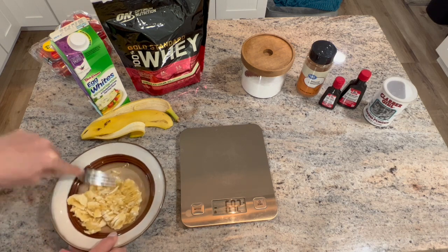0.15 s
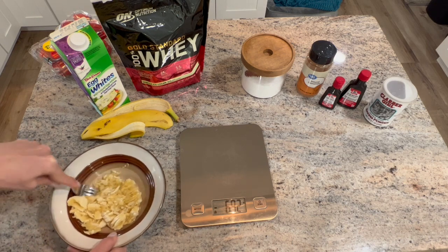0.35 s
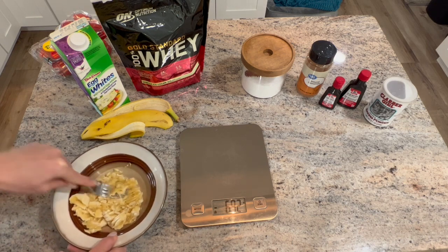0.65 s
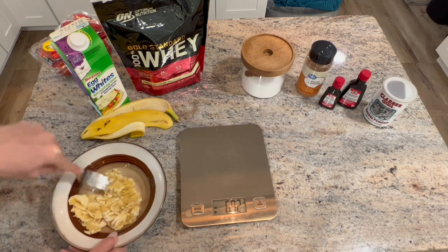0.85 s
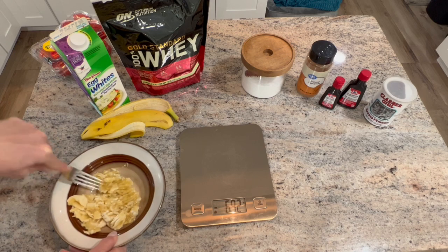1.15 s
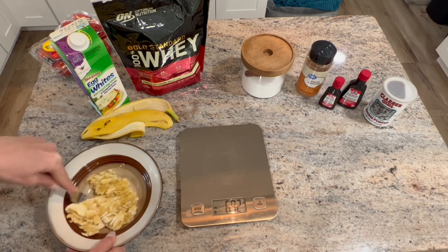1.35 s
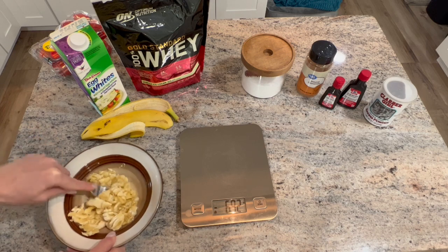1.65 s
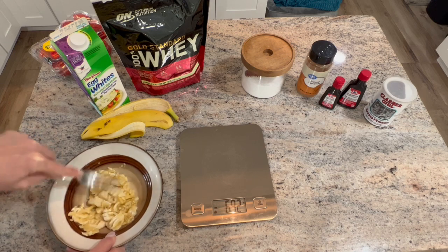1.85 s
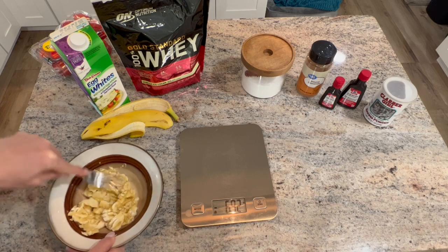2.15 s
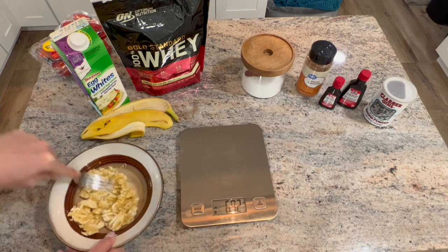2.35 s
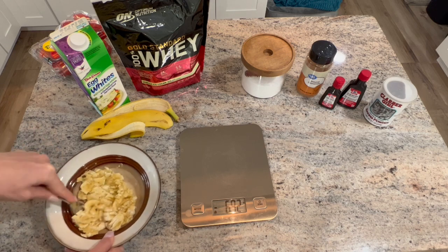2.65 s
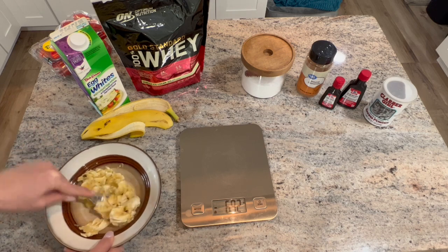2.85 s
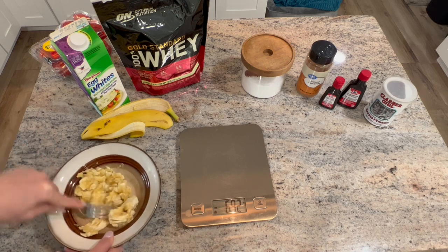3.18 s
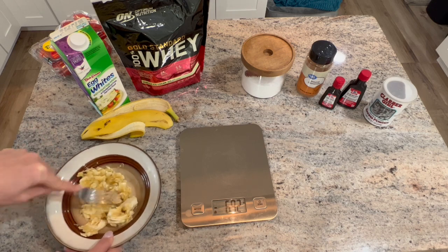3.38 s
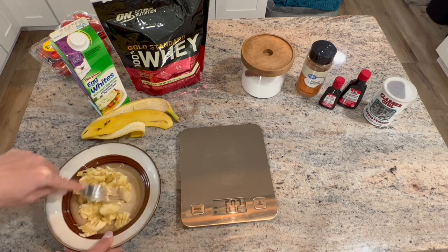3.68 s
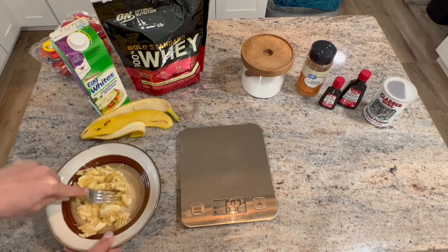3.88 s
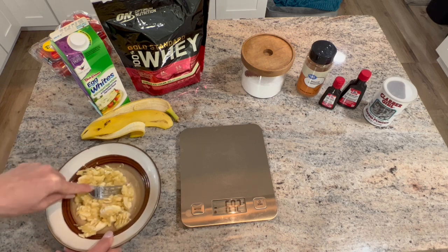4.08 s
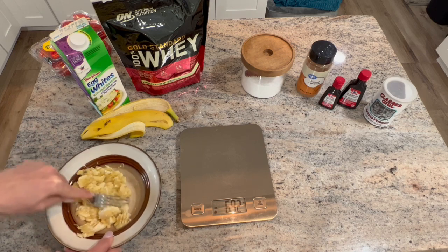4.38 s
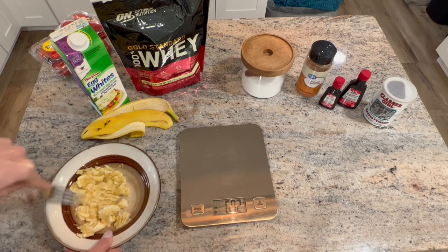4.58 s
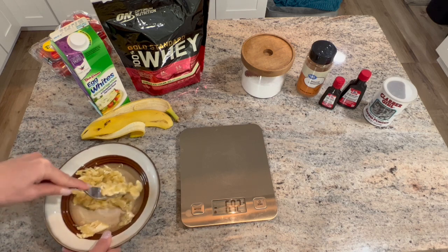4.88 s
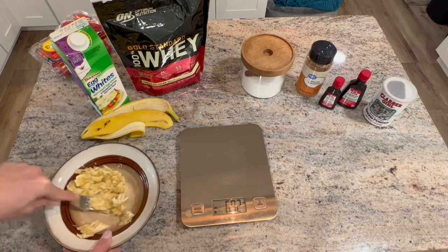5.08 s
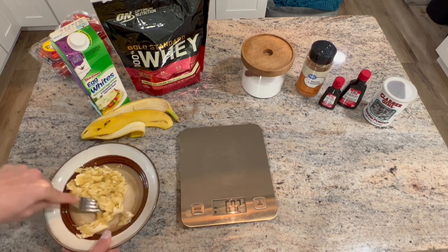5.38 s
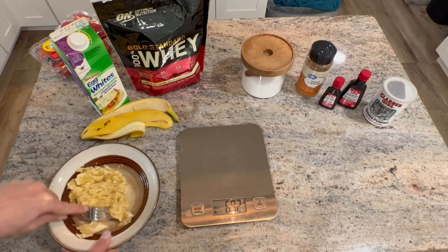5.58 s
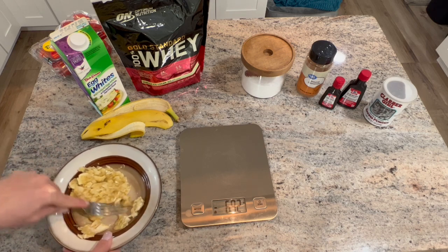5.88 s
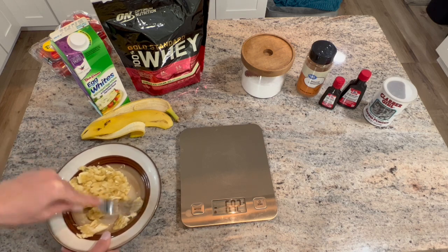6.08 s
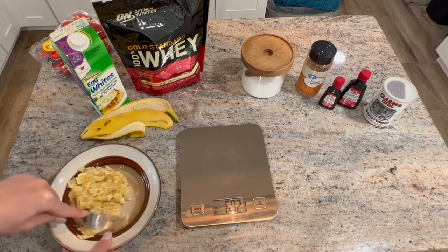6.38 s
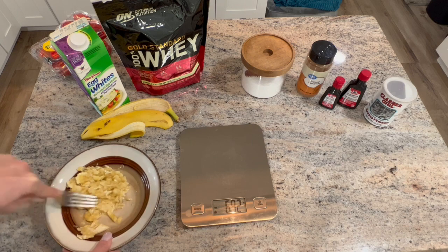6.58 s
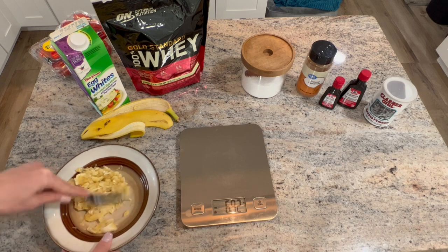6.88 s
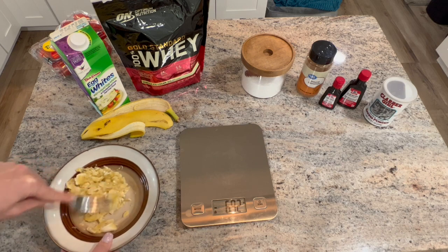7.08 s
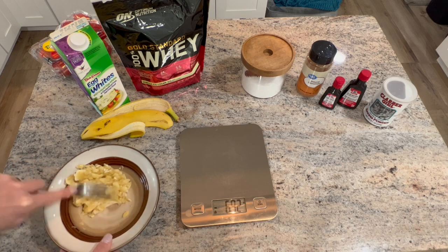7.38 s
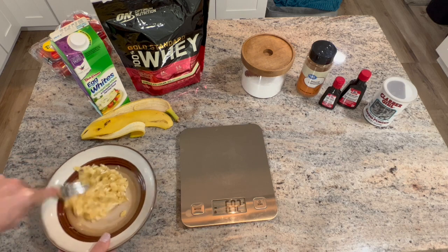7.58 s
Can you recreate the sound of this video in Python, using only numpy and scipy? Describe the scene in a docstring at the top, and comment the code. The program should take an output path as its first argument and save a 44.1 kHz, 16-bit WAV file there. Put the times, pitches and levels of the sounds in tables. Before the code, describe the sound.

Close, uneven knocks of a ceramic bowl on a counter mix with fork clinks, brief scrapes and the sticky crackle of mashed banana.

```python
"""Small kitchen: a steel fork mashes banana in a ceramic bowl on a stone counter.
On most strokes the tines clink on the glaze, at times dragging or squeaking, then the pressed
bowl knocks on the counter. Between them the wet pulp crackles and its air pockets pop.
A low appliance rumble lies underneath."""
import sys
import numpy as np
from scipy import signal
from scipy.fft import rfft, irfft
from scipy.io import wavfile
from scipy.ndimage import uniform_filter1d

SR = 44100
rng = np.random.default_rng(int(sys.argv[2]) if len(sys.argv) > 2 else 0)


def file_out(sig):
    """Save sig as 16-bit WAV at sys.argv[1]."""
    # one column per channel
    cols = np.atleast_2d(sig).T
    # limit, then scale
    lim = np.clip(cols, -1, 1)
    pcm = np.round(lim * 32767).astype(np.int16)
    wavfile.write(sys.argv[1], SR, pcm)


N = 341334
T = np.arange(SR // 2) / SR  # time within one event, s

# tine hits on the bowl: start_s, tick_db, fork_db, bright_db, drag_s
TINE_HITS = [(0.112, -21, -30, 16.5, 0.039), (0.4607, -27, -40.5, -1.5, 0.0095),
             (1.1004, -19.5, -41, -4.5, 0), (1.3449, -6.5, -21, 3.5, 0.063), (2.6109, -58.5, -27, 2, .095),
             (3.6478, -28, -42, -3.5, 0), (4.49, -27.5, -47, 0, 0), (4.7639, -23, -28.5, -6, 0.077),
             (5.122, -31.5, -47, -12, 0.0037), (5.429, -27.5, -51, -3.5, 0.0015),
             (5.6962, -22, -36.5, 6, 0), (5.9725, -19.5, -32, 1.5, .068), (6.249, -21, -30.5, 0.5, .05),
             (6.3368, -21.5, -37.5, -1, 0), (6.5278, -18, -32.5, 2.5, 0.051), (6.8063, -15, -28.5, 14, 0),
             (7.3262, -28.5, -32.5, 4.5, 0.09)]
# free modes of the bowl's wall: pitch_hz, relative_db, t60_s
WALL_MODES = [(1077, -2, .3), (2046, -3, .22), (3335, -3, .38), (4950, -8, .2), (6595, -3, .15),
              (8690, 3, .17), (10280, -3, .16), (12340, -8, .12)]
# fork modes: pitch_hz, relative_db, t60_s (capped in use)
FORK_MODES = [(1114, 1.5, 0.083), (2038, 2, 0.53), (2347, -9.5, 0.068), (2680, -26.5, 0.14),
              (4930, 2.5, 0.25), (5320, -9.5, 0.15), (5980, -6, .22), (6380, 0, 0.21), (6800, -3.5, 0.42),
              (7380, -3, 0.23), (8100, 0, .2), (8870, -3.5, 0.59), (10014, 1.5, 0.088), (11280, 0, 0.044),
              (10840, -8, .18), (13670, 1, .16), (14080, -6, .15), (15500, -7.5, 0.15)]
# steel-on-glaze contact noise: freq_hz, relative_db
TICK_SPECTRUM = [(300, -9.5), (1200, -6.5), (2200, -6), (3000, -26.5), (4000, -12), (5000, 7), (8000, -7.5),
                 (9300, -15), (10600, 10), (12200, -6), (14500, -3), (16000, -16.5)]
# snaps in wet pulp: freq_hz, relative_db
PULP_SPECTRUM = [(400, -19.5), (1200, -0.5), (2200, -1), (3500, -16), (6000, 4), (9000, -2), (12000, -1),
                 (16000, -10)]


def amp(db):
    """Decibels to gain."""
    return 10 ** (np.asarray(db) / 20)


def curve_at(points, hz):
    """Table interpolated over log frequency."""
    freq_hz, value = np.transpose(points)
    return np.interp(np.log(hz + 1), np.log(freq_hz), value)


def unit_rms(x, first_s=None):
    """Scales x to rms 1, over its opening first_s if given."""
    part = x[..., :max(int(first_s * SR), 16) if first_s else None]
    return x / np.sqrt(np.mean(part ** 2) + 1e-20)


def add(mix, start_s, sound):
    """Mixes a sound in at start_s."""
    part = mix[max(round(start_s * SR), 0):][:len(sound)]
    part += sound[:len(part)]


def colour(x, spectrum, size=2048):
    """Minimum-phase filter with the given spectrum."""
    log_gain = np.log(amp(curve_at(spectrum, abs(np.fft.fftfreq(size, 1 / SR)))))
    taps = np.fft.ifft(np.exp(np.conj(signal.hilbert(log_gain)))).real
    return signal.fftconvolve(x, taps[:size // 2])[:len(x)]


def burst(spectrum, t60_s):
    """Decaying coloured contact noise."""
    return colour(rng.standard_normal(len(T)) * amp(-60 * T / t60_s), spectrum)


def ring(hz, db, t60_s, detune):
    """Decaying modes; pitch, strength and sign vary at random, as with the point of impact."""
    shift, size, sign = rng.uniform(-1, 1, (3, len(hz)))
    poles = 2j * np.pi * hz * (1 + detune * shift) - np.log(1000) / t60_s
    strength = np.sign(sign) * amp(db + 3 * size)
    return strength @ np.exp(poles[:, None] * T[:len(T) * 2 // 3]).imag


def grains(per_s, spread_db):
    """Random impulses of very unequal size."""
    size = amp(spread_db * np.minimum(rng.exponential(1, len(T)), 4)) * rng.choice([-1, 1], len(T))
    return unit_rms(size * (rng.random(len(T)) < per_s / SR))


def appliance_rumble(level_db=-46.5, side_db=-19):
    """Machine rumble through the building, nearly mono in the bass, with faint hiss and hum."""
    # room tone: freq_hz, relative_db
    spectrum = [(20, -37.5), (36, -26), (47, -5.5), (56, -2), (66, 0), (92, -4.5), (115, -14), (140, -13),
                (185, -24), (290, -31.5), (450, -33.5), (1000, -50), (2000, -46.5), (4000, -52.5),
                (9000, -55), (16000, -59.5)]
    # steady hum: pitch_hz, level_db
    hum_lines = [(54, -46), (286, -71)]
    hz, t = np.fft.rfftfreq(N, 1 / SR), np.arange(N) / SR
    mid, side = rfft(rng.standard_normal((2, N)))
    side *= np.minimum(amp(side_db) * np.maximum(hz / 90, 1), .8)
    noise = irfft(np.array([mid + side, mid - side]) * amp(curve_at(spectrum, hz)), N)
    hum = sum(amp(db) * np.sqrt(2) * np.sin(2 * np.pi * (f * t + rng.random())) for f, db in hum_lines)
    return amp(level_db) * unit_rms(noise) + hum


def kitchen_reverb(x, predelay_s=.005, wide_above_hz=700):
    """Dense reflections from counter, packets and walls; each band decays at its own rate."""
    # room decay: freq_hz, t60_s
    decay = [(100, 0.56), (400, 0.25), (1000, 0.43), (2800, 0.34), (7000, 0.4), (15000, 0.07)]
    # reflection strength: freq_hz, gain_db
    send = [(60, -2.5), (300, 5.5), (700, -0.5), (1100, -4), (2000, -6), (5000, -6), (10000, -9.5),
            (16000, -21)]
    echoes = unit_rms(rng.standard_normal((2, SR)) * (rng.random((2, SR)) < 5000 / SR))
    hz, t, (mid, side) = signal.stft(echoes, SR, nperseg=256)
    width = .64 * np.minimum(hz / wide_above_hz, 1)[:, None]  # long waves reach both ports alike
    bands = np.array([mid + width * side, mid - width * side]) / np.sqrt(1 + width ** 2)
    t60_s = curve_at(decay, hz)[:, None]
    unit_energy = np.sqrt(np.log(1e6) / t60_s / SR)
    bands *= amp(curve_at(send, hz)[:, None] - 60 * t / t60_s) * unit_energy
    tail = np.pad(signal.istft(bands, SR, nperseg=256)[1], ((0, 0), (int(predelay_s * SR), 0)))
    return signal.fftconvolve(x[None], tail, axes=1)[:, :N]


def squelches(enter_s=.066, pull_s=.088, pull_db=-6):
    """Each stroke squeezes the pulp going in, sucks coming out. Rows: start_s, length_s, level_db."""
    # mashing strokes, about three a second: start_s, squelch_db, hold_s
    strokes = [(0, -54, .2), (0.44, -46.5, .155), (0.765, -50, 0.12), (1.075, -44.5, 0.11),
               (1.34, -35, .15), (1.701, -45.5, 0.14), (2.04, -48, 0.099), (2.314, -48.5, 0.07),
               (2.61, -42, 0.2), (2.981, -48.5, 0.12), (3.317, -44, .11), (3.629, -46.5, 0.13),
               (3.903, -49, 0.12), (4.179, -45.5, 0.069), (4.466, -45.5, 0.073), (4.76, -41.5, 0.14),
               (5.085, -49, 0.16), (5.398, -45.5, 0.14), (5.69, -47, 0.083), (5.97, -50, 0.072),
               (6.8, -46.5, .125), (7.325, -43, 0.1), (7.638, -49.5, .12)]
    entries = [(start_s, enter_s, db) for start_s, db, _ in strokes]
    pulls = [(start_s + hold_s, pull_s, db + pull_db) for start_s, db, hold_s in strokes]
    return entries + pulls


def bubble(decay_cycles, low_hz=1700, high_hz=11000):
    """A tiny cavity of random size rings briefly."""
    hz = low_hz * (high_hz / low_hz) ** rng.random()
    cycles = hz * T[:1024]
    return np.sin(2 * np.pi * cycles) * np.exp(-cycles / decay_cycles)


def pulp_crackle(hiss_db=-12, bubbles_db=-4, bubble_sizes=6):
    """Wet films tear in clumps under the tines: tiny snaps and bubbles over a soft hiss."""
    out = np.zeros(N)
    for start_s, length_s, level_db in squelches():
        size = int(length_s * SR)
        tearing = grains(per_s=1600, spread_db=6) + amp(hiss_db) * rng.standard_normal(len(T))
        snaps = colour(tearing, PULP_SPECTRUM)[:size]
        bubbles = np.zeros(size)
        for _ in range(bubble_sizes):
            triggers = grains(per_s=150, spread_db=4.5)[:size]
            cavity = unit_rms(bubble(decay_cycles=2.7, low_hz=2730))
            bubbles += signal.fftconvolve(triggers, cavity)[:size]
        clumps_db = 5.5 * unit_rms(uniform_filter1d(rng.standard_normal(size), size=130))
        squelch = unit_rms(amp(clumps_db) * (unit_rms(snaps) + amp(bubbles_db) * unit_rms(bubbles)))
        add(out, start_s, amp(level_db + 1) * squelch * signal.windows.tukey(size, .5))
    return out


def air_pops(snap_db=-4, above_squelch_db=18, spread_db=4, per_squelch=2):
    """Air pockets snap open: a few large ones, and small ones in every squelch."""
    # large pockets: start_s, peak_db
    large = [(0.2174, -20), (0.624, -19.5), (0.799, -33.5), (0.8787, -26.5), (1.49, -11.5), (1.8765, -21.5),
             (2.0764, -20), (2.3543, -19), (2.801, -15.5), (2.8605, -18.5), (3.0183, -15), (3.329, -19.5),
             (3.349, -17.5), (3.491, -24.5), (4.2151, -14.5), (4.9496, -18)]
    out = np.zeros(N)
    spans = squelches()
    scatter = rng.uniform(-.8, 1, (len(spans), per_squelch, 2))
    small = [(start_s + length_s * (1 + when) / 2, db + above_squelch_db + spread_db * size)
             for (start_s, length_s, db), draws in zip(spans, scatter) for when, size in draws]
    for start_s, peak_db in large + small:
        cavity = bubble(decay_cycles=.6)
        snap = unit_rms(burst(PULP_SPECTRUM, t60_s=.0017), first_s=.003)
        pop = cavity + amp(snap_db) * snap[:len(cavity)]
        add(out, start_s, amp(peak_db) * pop / abs(pop).max())
    return out


def grind(drive, width_hz=240, floor_db=-9):
    """Grit drives the fork's broad resonances, a different mix at every grip."""
    mode_hz, mode_db, _ = np.transpose(FORK_MODES)
    grip_db = rng.uniform(-4, 4, len(mode_hz))
    hz = np.fft.rfftfreq(len(drive), 1 / SR)
    peaks = 1 / (1 + ((hz - mode_hz[:, None]) / (width_hz / 2)) ** 2)
    power = amp(mode_db + grip_db) ** 2 @ peaks + amp(floor_db + curve_at(TICK_SPECTRUM, hz)) ** 2
    return colour(drive, np.c_[hz + 1, 10 * np.log10(power)])


def tine_scrapes(delay_s=.006, drag_db=-8.5, wall_db=-12):
    """Tines dragged on after a clink grind the glaze and keep the bowl's wall singing."""
    out = np.zeros(N)
    for start_s, _, fork_db, _, drag_s in TINE_HITS:
        if drag_s == 0:
            continue
        size = max(int(drag_s * SR), 256)
        grit = grains(per_s=3500, spread_db=4)
        wall = signal.fftconvolve(grit, ring(*np.transpose(WALL_MODES), detune=.0085))
        drag = unit_rms(grind(grit)[:size]) + amp(wall_db) * unit_rms(wall[:size])
        add(out, start_s + delay_s, amp(fork_db + drag_db) * drag * signal.windows.tukey(size, .5))
    return out


def tine_squeaks(waver=.026):
    """A tine sticks and slips on the glaze: a short, wavering glide."""
    # stick-slip glides: start_s, length_s, first_hz, last_hz, level_db
    glides = [(2.623, 0.048, 1650, 1315, -38.5), (2.651, 0.012, 6450, 6160, -25),
              (2.671, 0.0064, 6550, 6250, -22.5), (6.337, 0.033, 6750, 6680, -27),
              (6.559, 0.0297, 6050, 6630, -29), (7.352, 0.026, 6200, 6370, -34)]
    out = np.zeros(N)
    for start_s, length_s, first_hz, last_hz, level_db in glides:
        size = int(length_s * SR)
        jitter = unit_rms(uniform_filter1d(rng.standard_normal(size), size=40))
        hz = np.linspace(first_hz, last_hz, size) * (1 + waver * jitter)
        tone = unit_rms(np.sin(2 * np.pi * np.cumsum(hz) / SR))
        add(out, start_s, amp(level_db) * tone * signal.windows.tukey(size, .5))
    return out


def glint(hz, centre_hz=11000, half_width_oct=.2):
    """Weight, 0 to 1, of the high band that glancing hits favour."""
    return np.exp(-(np.log2(hz / centre_hz) / half_width_oct) ** 2)


def fork_clinks(tine_count=3, rattle_db=-1, firm_db=-23, max_t60_s=.21):
    """Steel meets glaze: a sharp tick, unequal tines ringing and rattling, and the bowl's wall."""
    out = np.zeros(N)
    hz, db, t60_s = np.transpose(FORK_MODES)
    t60_s = np.minimum(t60_s, max_t60_s)  # keeps the fork's ring short
    for start_s, tick_db, fork_db, bright_db, _ in TINE_HITS:
        grip_db = rng.uniform(-4, 4, len(hz))
        modes_db = db + grip_db + bright_db * glint(hz)
        tines = sum(ring(hz, modes_db, t60_s, detune=.015) for _ in range(tine_count))
        size = len(tines)
        first_swing = unit_rms(tines * amp(-60 * T[:size] / .021), first_s=.0028)  # dies in the pulp
        spectrum = [(f, band_db + bright_db * glint(f)) for f, band_db in TICK_SPECTRUM]
        tick = unit_rms(burst(spectrum, t60_s=.028), first_s=.01)[:size]
        add(out, start_s, amp(tick_db) * (first_swing + tick / 2))
        rattle = grind(rng.standard_normal(len(T)) * amp(-60 * T / .44))[:size]
        fork = unit_rms(tines, first_s=.025) + amp(rattle_db) * unit_rms(rattle, first_s=.011)
        add(out, start_s, amp(fork_db - 5.5) * fork)
        # the wall rings more under firm hits, less under bright, glancing ones
        wall_db = fork_db - 21.5 + 1.05 * max(tick_db - firm_db, 0) - .52 * bright_db
        for _ in range(2):  # bowl modes come in close pairs
            add(out, start_s, amp(wall_db) * ring(*np.transpose(WALL_MODES), detune=.0044))
    return out


def blows(jump_above_db=-13.5, rebound_s=.03, rebound_db=-13.5, rebound_hardness_db=-13):
    """Knocks; after heavy ones the bowl lands again, duller. Rows: start_s, level_db, hardness_db."""
    # bowl on counter: start_s, level_db
    knocks = [(0.1903, -26), (0.398, -35), (0.4784, -34.5), (0.8851, -49.5), (0.982, -43), (1.0626, -38.5),
              (1.3475, -15.5), (1.474, -44), (1.7621, -10.5), (1.974, -44.5), (2.135, -41.5),
              (2.1917, -33.5), (2.268, -34.5), (2.4482, -25.5), (2.7183, -11), (3.1203, -21.5),
              (3.4301, -32), (3.6343, -34.5), (3.677, -32), (3.9826, -39.5), (4.054, -26.5), (4.505, -20),
              (4.563, -24), (4.7679, -26.5), (4.838, -19), (5.1356, -21.5), (5.2071, -20), (5.4489, -29),
              (5.51, -21), (5.7189, -21.5), (5.7697, -26.5), (6.0292, -12.5), (6.0567, -16),
              (6.2552, -27.5), (6.3358, -1.5), (6.5545, -19), (6.6083, -21), (6.8849, -31.5),
              (7.666, -41.5)]
    # upper minus lower modes, by knock strength: level_db, hardness_db
    hardness = [(-42.5, -27), (-27.5, -18.5), (-20.5, -4.5), (-17, 4.5), (-9, 10.5), (-3, 5.5)]
    direct = [(start_s, db, np.interp(db, *np.transpose(hardness))) for start_s, db in knocks]
    rebounds = [(start_s + rebound_s, db + rebound_db, rebound_hardness_db)
                for start_s, db in knocks if db > jump_above_db]
    return direct + rebounds


def chatter(x, count=3, within_s=.009, touch_db=-4):
    """The bowl rocks on its foot ring and touches down again in quick succession."""
    touches = np.zeros(1024)
    touches[0] = 1
    delays = (rng.uniform(.2, 1, count) * within_s * SR).astype(int)
    touches[delays] += amp(touch_db) * rng.uniform(-1, 1, count)
    return signal.fftconvolve(x, touches)[:len(x)]


def tilt(hz, pivot_hz=1250):
    """Weight, -0.5 to 0.5, by which hard contact favours the upper modes."""
    return np.tanh(np.log(hz / pivot_hz) / .88) / 2


def bowl_knocks(medium_db=-23.5, heavy_db=-5, max_t60_s=.065):
    """The foot ring slaps the stone: damped bowl modes, dull thud, thin crack; heavy blows boom."""
    # modes of the bowl's short, dry knock on the counter: pitch_hz, relative_db, t60_s (capped below)
    foot_modes = [(283.9, -29.5, .2), (359, -17, 0.16), (524, -15, 0.033), (602.6, -11, 0.1),
                  (694, -14, 0.22), (819, -23.5, .07), (935.7, -1.5, 0.09), (1050.3, -2, 0.09),
                  (1111, -4.5, 0.067), (1283.6, -5, 0.22), (1421, -3, 0.037), (1610, -10, 0.038),
                  (1949, -5, 0.035), (2290, -15, 0.15), (2465, -15.5, 0.079)]
    # low contact noise: freq_hz, relative_db
    thud_spectrum = [(30, -24.5), (70, -12.5), (150, -13.5), (400, -9.5), (1000, 4), (1900, -4),
                     (3000, -27), (6000, -42.5), (16000, -69)]
    # high contact noise: freq_hz, relative_db
    crack_spectrum = [(1000, -17), (2800, 2), (4000, -10), (6600, 0.5), (8200, -8), (11000, -18),
                      (16000, -19)]
    # counter and cabinet: pitch_hz, relative_db, t60_s
    counter_modes = [(71, -15, 0.24), (101, -23, 0.56), (197, -21, .25), (289.5, -21.5, .22)]
    out = np.zeros(N)
    hz, db, t60_s = np.transpose(foot_modes)
    t60_s = np.minimum(t60_s, max_t60_s)
    for start_s, level_db, hardness_db in blows():
        modes = ring(hz, db + hardness_db * tilt(hz), t60_s, detune=.039)
        body = unit_rms(chatter(modes), first_s=.017)
        size = len(body)
        spectrum = [(f, band_db + hardness_db * tilt(f)) for f, band_db in thud_spectrum]
        thud = unit_rms(burst(spectrum, t60_s=.058), first_s=.004)[:size]
        crack = unit_rms(burst(crack_spectrum, t60_s=.08), first_s=.0035)[:size]
        crack_db = -28 + .79 * max(level_db - medium_db, 0)
        knock = unit_rms(body + amp(-2) * thud, first_s=.0077) + amp(crack_db) * crack
        add(out, start_s, amp(level_db + .5) * knock)
        boom = ring(*np.transpose(counter_modes), detune=.012)
        boom_db = level_db - 3 + np.clip(level_db - heavy_db, -5, 0)
        swell = 1 - np.exp(-T[:size] / .022)  # the heavy slab starts slowly
        add(out, start_s, amp(boom_db) * boom * swell)
    return out


def scene():
    """The bowl close to two microphone ports, with kitchen reflections and rumble."""
    # left port behind right: freq_hz, lag_rad
    port_lag = [(100, 0.062), (1100, 0.92), (3500, 0.14), (5200, 1.2), (16000, 1.51)]
    bowl = bowl_knocks() + fork_clinks() + tine_scrapes() + tine_squeaks() + pulp_crackle() + air_pops()
    in_room = bowl * amp([[-.4], [.4]]) + kitchen_reverb(bowl) * amp([[.7], [-.7]])
    lag_rad = curve_at(port_lag, np.fft.rfftfreq(N, 1 / SR))
    at_ports = irfft(rfft(in_room) * np.exp(np.outer([-.5j, .5j], lag_rad)), N)
    return at_ports + appliance_rumble() * amp([[.4], [-.4]])


def record(dry):
    """The hardest knocks clip; a low-pass follows."""
    cutoff_hz = 16100
    lowpass = signal.firwin(201, cutoff_hz, window=("kaiser", 7), fs=SR)
    return signal.oaconvolve(np.clip(dry, -1, 1), lowpass[None], "same")


dry = scene()
out = record(dry)
file_out(out)
```